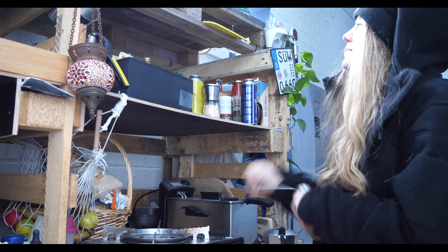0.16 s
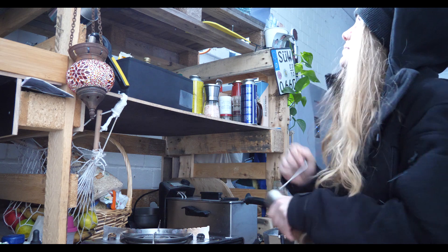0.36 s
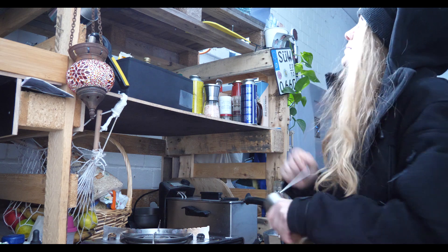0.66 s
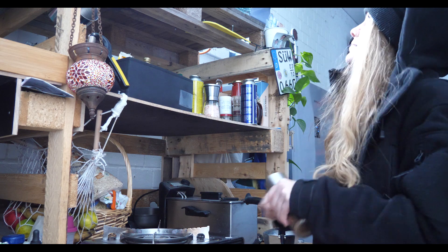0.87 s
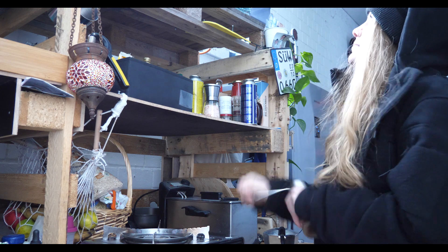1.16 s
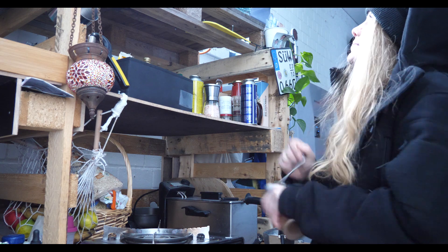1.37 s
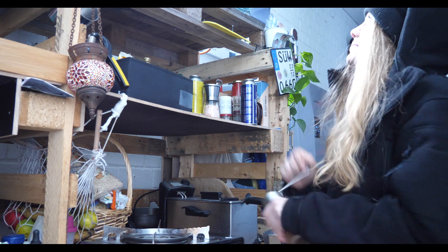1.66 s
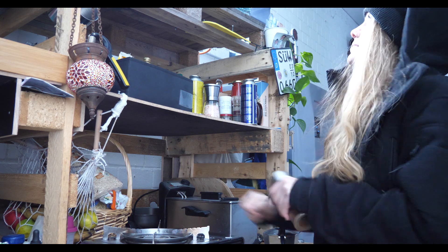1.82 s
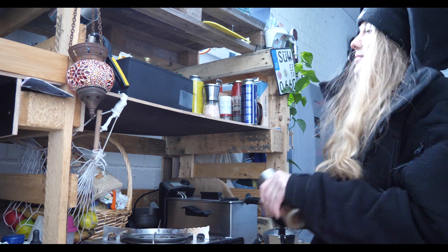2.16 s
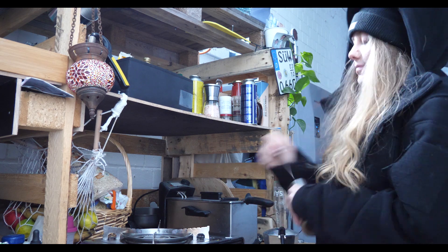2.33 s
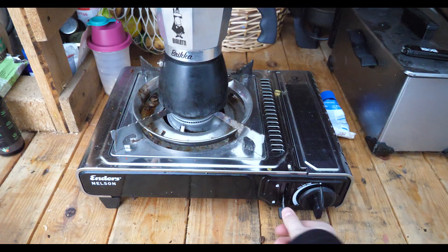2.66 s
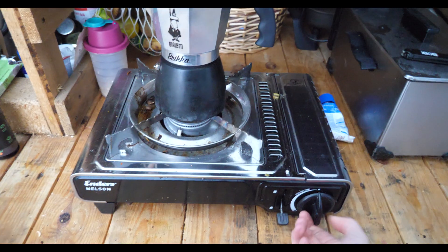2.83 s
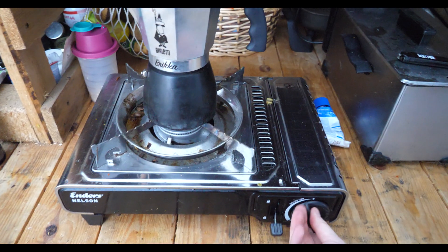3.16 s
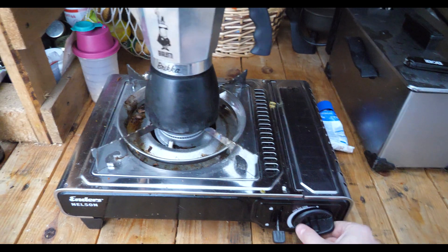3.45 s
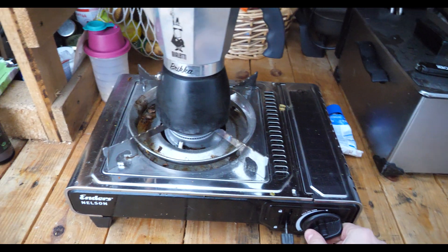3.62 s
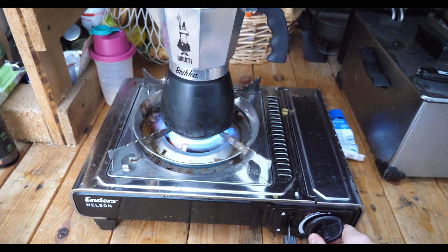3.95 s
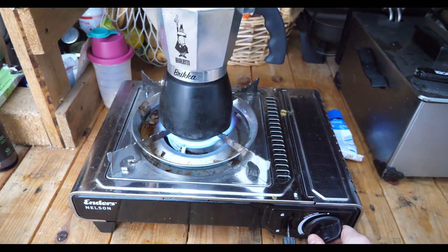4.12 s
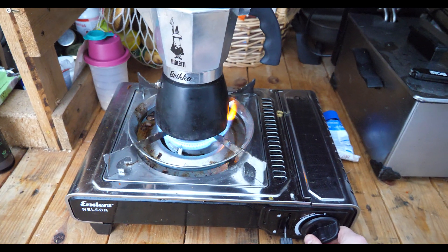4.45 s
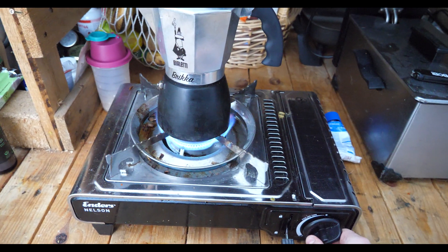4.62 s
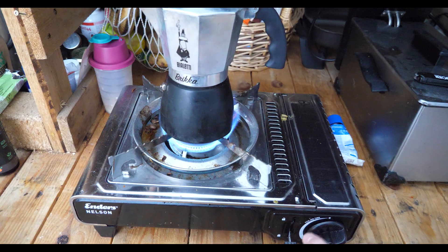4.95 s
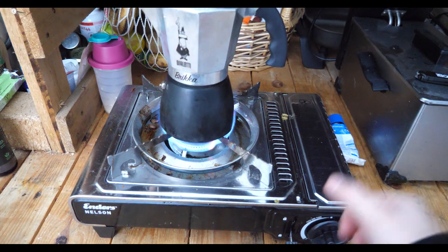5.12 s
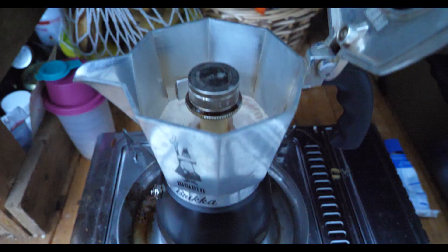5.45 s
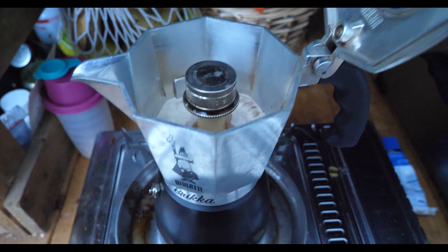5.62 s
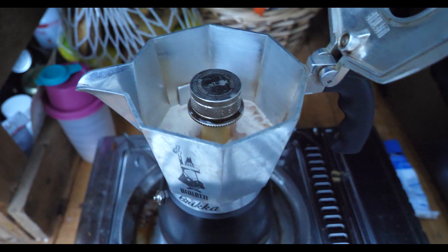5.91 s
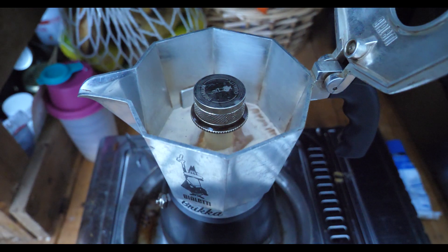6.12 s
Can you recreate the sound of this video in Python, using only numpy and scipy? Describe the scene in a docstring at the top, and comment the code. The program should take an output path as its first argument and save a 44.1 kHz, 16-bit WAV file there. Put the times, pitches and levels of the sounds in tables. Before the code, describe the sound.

Gritty hand grinding of coffee beans, hard metallic stove clicks, gas hiss and a soft ignition whoosh, then bubbling, fizzing coffee rising in a pot.

```python
"""A hand mill grinds coffee beans in a garage: random grains of noise ring its housing, and its shaft squeaks.
Then a camping stove's lever, knob and igniter clack as short noise bursts ringing at set pitches.
Its gas is steady noise coloured by a tube; the flame catches with a whoosh of noise, then flutters.
Last, an open moka pot gurgles and foams: grains and noise through resonances follow the coffee's flow.
Table levels are relative settings: the functions balance them further."""
import sys
import numpy as np
from scipy import signal
from scipy.fft import rfft, irfft, next_fast_len
from scipy.io import wavfile
from scipy.ndimage import map_coordinates

SR = 44100
rng = np.random.default_rng(int(sys.argv[2]) if len(sys.argv) > 2 else 0)


def to_wav(s):
    """Save 16-bit WAV."""
    ch = np.atleast_2d(s).T  # columns
    pcm = np.round(np.clip(ch, -1, 1) * 32767)  # PCM
    wavfile.write(sys.argv[1], SR, pcm.astype(np.int16))


N = 276948  # length in samples


def amp(db):
    """Turn decibels into gain."""
    return 10 ** (np.asarray(db) / 20)


def unit(x):
    """Scale x to an rms of 1."""
    return x / np.sqrt(np.mean(x ** 2) + 1e-20)


def along(points, hz):
    """Read values between (f/Hz, value) points on a log frequency axis."""
    f, v = np.transpose(points)
    return np.interp(np.log(hz + 1), np.log(f + 1), v)


def track(rows):
    """Draw straight lines between (t/s, value) rows, giving one value per sample."""
    return np.interp(np.arange(N) / SR, *np.transpose(rows))


def wobble(rate):
    """Draw a smooth random curve with rate knots a second."""
    knots = rng.standard_normal(N // 50)
    return map_coordinates(knots, [np.arange(N) * rate / SR], mode="wrap")


def swells(rows, attack_s, release_s):
    """Gain of (start t/s, length/s, level/dB) events: each rises to its start, holds and dies away."""
    t = np.arange(N) / SR
    power = 0
    for s, length, db in rows:
        rise = np.minimum(t - s, 0) / attack_s
        fall = np.maximum(t - s - length, 0) / release_s
        power = power + (amp(db) * np.exp(rise - fall)) ** 2
    return np.sqrt(power)


def during(start, end):
    """1 from 5 ms before start to 5 ms after end, with 5 ms fades beyond."""
    t = np.arange(N) / SR
    return np.clip(np.minimum(t - start, end - t) / 0.005 + 2, 0, 1)


def filtered(x, response):
    """Multiply the spectrum of x by a response that depends on frequency."""
    m = next_fast_len(x.shape[-1] + SR // 2)
    return irfft(rfft(x, m) * response(np.fft.rfftfreq(m, 1 / SR)), m)[..., :x.shape[-1]]


def colour(x, spectrum):
    """Shape x by a (f/Hz, level/dB) curve."""
    return filtered(x, lambda hz: amp(along(spectrum, hz)))


def resonate(x, modes):
    """Let x ring through (f/Hz, width/Hz, level/dB) resonances, with alternating signs."""
    def response(f):
        total = 0
        for k, (centre, width, db) in enumerate(modes):
            peak = 1j * f * width / (centre * centre - f * f + 1j * f * width)
            total = total + (-1) ** k * amp(db) * peak
        return total
    return filtered(x, response)


def ring(x, hz, width_hz):
    """Pass x through one resonance, which may move in pitch."""
    turn = np.exp(2j * np.pi * np.cumsum(hz * np.ones(x.shape[-1])) / SR)
    keep = np.exp(-np.pi * width_hz / SR)
    # turn the pitch down to zero, smooth, then turn it back up
    smooth = signal.lfilter([np.sqrt(2 * (1 - keep ** 2))], [1, -keep], x / turn)
    return (smooth * turn).real


def band(x, lo_hz, hi_hz):
    """Cut a steep band out of x; white noise keeps its rms."""
    hi_hz = min(hi_hz, SR * 0.45)
    sos = signal.butter(3, [lo_hz, hi_hz], "band", fs=SR, output="sos")
    return signal.sosfilt(sos, x) * np.sqrt(SR / 2 / (hi_hz - lo_hz))


def noise():
    """White noise for the middle and the side of the stereo field."""
    return rng.standard_normal((2, N))


def grains(rate, spread_db, life):
    """Tiny noise bursts at random times, rate a second; spread_db makes a few much larger than the rest."""
    sizes = (rng.random(N) < rate / SR) * amp(spread_db * np.minimum(rng.exponential(size=N), 4))
    power = signal.lfilter([1], [1, -np.exp(-2 / (life * SR))], sizes ** 2)
    return unit(np.sqrt(power) * noise())


def burst(t60, attack):
    """A puff of noise that starts sharply and dies away."""
    t = np.arange(SR // 2) / SR
    return rng.standard_normal((2, len(t))) * amp(-60 * t / t60) * (1 - np.exp(-t / attack))


def add(mix, s, sound):
    """Mix a sound in at s seconds."""
    part = mix[:, max(round(s * SR), 0):][:, :sound.shape[-1]]
    part += sound[..., :part.shape[-1]]


# how hard the burrs work; the crank nearly stalls once: t/s, level/dB
MILL_LOAD = [(0.0, -31), (0.17, -32), (0.32, -30), (0.57, -30.5), (0.67, -30), (0.76, -30.5), (0.91, -28),
             (1.07, -32), (1.17, -29), (1.245, -38), (1.43, -27.5), (1.52, -31), (1.71, -28), (1.9, -29),
             (2.08, -31), (2.33, -31), (2.41, -32), (2.54, -30)]
# the burrs bite into a batch of beans: start t/s, length/s, level/dB, fragment pitch f/Hz
CRUNCHES = [(0.005, 0.1, -24, 1660), (0.286, 0.06, -24, 1530), (0.491, 0.031, -26, 2100),
            (0.672, 0.035, -27, 1560), (0.781, 0.059, -26, 2030), (0.914, 0.015, -23.5, 1660),
            (0.976, 0.024, -26, 1640), (1.281, 0.11, -29.5, 1900), (1.424, 0.03, -21.5, 1620),
            (1.534, 0.02, -24, 1870), (1.653, 0.06, -24, 1640), (1.924, 0.083, -25, 1660),
            (2.189, 0.014, -23.5, 1650), (2.25, 0.085, -29.5, 1590), (2.466, 0.081, -23.5, 1770)]
# whole beans breaking: t/s, level/dB, f/Hz
BEAN_CRACKS = [(0.0034, -9, 1780), (0.2797, -13, 1620), (0.3221, -14, 1600), (0.5042, -8, 2170),
               (0.6538, -5, 1600), (0.823, -10, 2120), (0.9047, -3, 1640), (0.9114, -9, 1580),
               (0.9741, -10, 1640), (0.9804, -9, 1590), (1.0325, -9, 1630), (1.4214, -11, 1620),
               (1.4266, -6, 1640), (1.4424, -9, 1610), (1.5433, -12, 1910), (1.6381, -10, 1540),
               (1.69, -9, 1590), (1.8047, -13, 1550), (2.1569, -13, 1640), (2.1903, -11, 1620),
               (2.324, -9, 1450)]
# colour of the crushing: f/Hz, level/dB
GRIT_COLOUR = [(40, -77), (80, -26), (180, -24.5), (350, -6.5), (440, -10.5), (570, -4.5), (1000, -6),
               (2300, -4), (3000, -8.5), (4300, -5), (5800, -14), (9500, -14), (13000, -43), (15500, -35)]
# resonances of the mill's housing: f/Hz, width/Hz, level/dB
HOUSING_MODES = [(814.5, 20, -7.5), (860, 45, -10.5), (1334, 33, -6.5), (1445, 32, -5.5), (1619, 43, 0),
                 (1825, 34, -5.5), (2070, 190, -10), (3615, 67, -13), (4340, 77, -14.5), (4690, 39, -12.5)]
# the crank rocks the cup, which knocks against the mill: t/s, level/dB
CUP_KNOCKS = [(0.0, -31), (0.085, -31), (0.115, -31), (0.205, -25), (0.27, -32.5), (0.405, -27),
              (0.465, -37), (0.57, -27), (0.81, -25), (0.885, -30), (0.97, -31), (1.125, -30), (1.375, -25),
              (1.42, -27.5), (1.465, -33), (1.55, -33), (1.625, -35), (1.68, -33), (1.805, -28.5),
              (1.86, -30), (2.005, -33), (2.18, -28), (2.28, -31), (2.415, -37), (2.48, -34.5)]
# resonances of the cup: f/Hz, width/Hz, level/dB
CUP_MODES = [(258.5, 27.6, -2), (314.2, 19, 3), (403, 11, -15)]
# beans slide down the steel hopper: start t/s, length/s, level/dB
BEAN_SLIPS = [(0.01, 0.0069, -33), (0.08, 0.044, -33), (0.36, 0.073, -41), (0.58, 0.03, -39.5),
              (0.7, 0.037, -33), (0.85, 0.082, -38.5), (1.0, 0.039, -34.5), (1.15, 0.025, -32.5),
              (1.41, 0.059, -37.5), (1.7, 0.049, -31), (1.97, 0.07, -37), (2.13, 0.025, -34.5),
              (2.31, 0.024, -31)]
# colour of beans on steel: f/Hz, level/dB
SLIDE_COLOUR = [(500, -47.5), (4000, -0.5), (6500, -5.5), (8000, 0.5), (9000, -3.5), (11200, -1),
                (13000, -5.5), (15500, -17.5)]
# the shaft rubs in its bearing nearly four times a second: start t/s, length/s, level/dB
SHAFT_RUBS = [(0.06, 0.062, -32), (0.29, 0.12, -40.5), (0.595, 0.19, -39), (0.9, 0.13, -41.5),
              (1.155, 0.017, -29.5), (1.4, 0.1, -43), (1.6, 0.15, -40.5), (1.89, 0.13, -36.5),
              (2.13, 0.18, -38.5), (2.43, 0.03, -37)]
# resonances of the steel shaft: f/Hz, width/Hz, level/dB
SHAFT_MODES = [(8075, 60, -7), (9503, 38, 0), (13212, 28, -6)]
MILL_STOP_S, CHIRP_WIDTH_HZ = 2.551, 150
CRUNCH_DB, CRUNCH_GROWS = -1.5, 1.4  # steady crunch relative to the average load; its dB per dB of load
TRICKLE_DB = -10  # beans shifting between slips, relative to the load
CUP_TREMOR_DB = -44  # the cup trembles between knocks


def mill():
    """Burrs crush fragments and whole beans; the housing rings, the cup knocks and the rubbing shaft squeaks."""
    t = np.arange(N) / SR
    load_db = track(MILL_LOAD)
    usual_db = load_db.mean()
    extra_db = load_db - usual_db

    steady = amp(usual_db + CRUNCH_DB + CRUNCH_GROWS * extra_db + 0.5 * wobble(35.2))
    bites = swells([row[:3] for row in CRUNCHES], attack_s=0.0072, release_s=0.023)
    crunch = np.hypot(steady, bites)
    crunch_hz = track([(s + length / 2, hz) for s, length, _, hz in CRUNCHES])
    grit = amp(load_db + 2.1) * unit(colour(grains(rate=1100, spread_db=1.5, life=0.0082), GRIT_COLOUR))
    shaking = grains(rate=440, spread_db=2.5, life=0.00063)
    housing = amp(-0.5) * crunch * unit(resonate(shaking, HOUSING_MODES))
    # the fragments chirp together at one wandering pitch
    chirp_hz = crunch_hz * 2 ** (0.17 * wobble(30))
    chips = grains(rate=290, spread_db=0.0, life=0.003)
    fragments = amp(-4.5) * crunch * unit(ring(chips, chirp_hz, CHIRP_WIDTH_HZ))

    cracks = np.zeros((2, N))
    for s, db, hz in BEAN_CRACKS:
        snap = burst(t60=0.031, attack=0.0001)
        crack = ring(snap, hz, width_hz=100) + amp(10) * colour(snap, GRIT_COLOUR)
        add(cracks, s, amp(db - 9.5) * crack)

    blows = np.zeros((2, N))
    for s, db in CUP_KNOCKS:
        add(blows, s, amp(db + 29.5) * burst(t60=0.036, attack=0.00039))
    tremor = unit(resonate(grains(rate=260, spread_db=0.8, life=0.0015), CUP_MODES))
    cup = resonate(blows, CUP_MODES) + amp(CUP_TREMOR_DB + extra_db) * tremor
    body_colour = [(40, -39.0), (170, -1), (240, 1), (5000, -1.5), (12000, -6.5)]
    body = colour(cup + housing + fragments + cracks, body_colour)

    slide = np.hypot(amp(load_db + TRICKLE_DB), swells(BEAN_SLIPS, attack_s=0.0059, release_s=0.017))
    beans = amp(4.5) * slide * unit(colour(grains(rate=6700, spread_db=5.0, life=0.00091), SLIDE_COLOUR))

    # friction keeps the shaft's notes singing, each wandering around its pitch
    singing = np.zeros(N)
    for hz, width, db in SHAFT_MODES:
        note_hz = hz + 1.4 * width * wobble(250)
        singing += amp(db) * np.sin(2 * np.pi * np.cumsum(note_hz) / SR)
    rubbing = amp(0.5 + 2.85 * wobble(40.56)) * swells(SHAFT_RUBS, attack_s=0.017, release_s=0.047)
    middle_only = [[1], [0]]
    squeak = rubbing * (unit(singing) * middle_only + unit(resonate(noise(), SHAFT_MODES)))
    return (grit + body + beans + squeak) * (t < MILL_STOP_S)


# colour of the quiet garage: f/Hz, level/dB
AIR_COLOUR = [(18, -96), (30, -59.5), (69, -9), (130, -2), (591, -10), (830, -8.5), (921, -13), (996, -4),
              (1140, -22), (1640, -8), (2020, -18), (2240, -13.5), (15500, -22)]


def quiet_air():
    """The garage's faint background is coloured noise that drifts in level."""
    return amp(-61.0 + 0.43 * wobble(4.09)) * unit(colour(noise(), AIR_COLOUR))


# lever, knob and igniter; thud, snap and ring are relative to the clack;
# decay sets the t60 of clack, ring, snap and thud; boom and case blow have fixed ones:
# t/s, level/dB, thud level/dB, snap level/dB, ring level/dB, clack f/Hz, decay/s
STOVE_CLICKS = [(2.551, -22, 3.5, 2, -3.5, 2880, 0.25), (2.577, -2.5, -14.5, -4.5, -15, 2450, 0.043),
                (2.767, -22.5, -6, -22, -12, 2560, 0.08), (2.839, -26.5, 0.5, -7, -9, 2640, 0.04),
                (2.864, -30.5, -7.5, -12, -3, 744, 0.049), (2.866, -42, -7, -12, 5.5, 2590, 0.027),
                (2.995, -49, -14, -6, -12, 1486, 0.17), (3.064, -57, 21.5, 5, -24, 1970, 0.17),
                (3.084, -19.5, -5.5, -5, -17.5, 2140, 0.033), (3.089, -3, -10.5, -21, -22, 2060, 0.012),
                (3.0888, -16, -29, -25, 0.5, 8550, 0.024), (3.546, -28, 1, -8, -24, 2320, 0.055),
                (3.553, -25, -3.5, 0.5, -8.5, 1450, 0.051), (3.943, -3, -21, 4.5, -11, 1950, 0.025),
                (4.103, -22, -4.5, 4, -17.5, 2440, 0.03), (4.534, -53, -15, -20, -2, 2350, 0.14),
                (4.7148, -41.5, 0.5, -2, -3, 797, 0.092), (4.835, -22, -5.5, -34, -3.5, 1235, 0.078),
                (4.917, -47.5, 11, -18, -13, 1390, 0.048)]
# resonances of the sheet steel case: f/Hz, width/Hz, level/dB
CASE_MODES = [(339, 55, -10), (404, 60, -11), (769, 12, -3.5), (1345, 60, -7), (1850, 300, -20.5),
              (2440, 90, -17.5), (2660, 60, -35), (3970, 99, -18.5)]
CLACK_Q = 23  # sharpness of each contact's ring: its pitch over its width


def clicks():
    """Each contact is a ringing clack, a thud and a shorter snap; it also shakes the steel case and the table."""
    out, blows = np.zeros((2, N)), np.zeros((2, N))
    for s, db, thud_db, snap_db, ring_db, hz, decay in STOVE_CLICKS:
        clack = band(burst(t60=1.34 * decay, attack=0.00095), hz / 2.34, hz * 1.625)
        note = amp(ring_db + 7.0) * ring(burst(t60=decay, attack=0.00084), hz, hz / CLACK_Q)
        snap = amp(snap_db + 1.5) * band(burst(t60=0.79 * decay, attack=0.0007), lo_hz=5550, hi_hz=12400)
        thud = band(burst(t60=2.35 * decay, attack=0.0077), lo_hz=282, hi_hz=940)
        boom = amp(-17.5) * band(burst(t60=0.38, attack=0.0049), lo_hz=88, hi_hz=165)
        low = amp(thud_db - 5.5) * (thud + boom)
        add(out, s, amp(db - 6) * (clack + note + snap + low))
        add(blows, s, amp(db + thud_db) * burst(t60=0.041, attack=0.0008))
    return out + amp(23) * resonate(blows, CASE_MODES)


# how fast echoes die in the garage: f/Hz, t60/s
ROOM_DECAY = [(120, 0.44), (400, 0.4), (1500, 0.44), (4000, 0.42), (8000, 0.41), (14000, 0.12)]


def garage(x):
    """The room answers the middle signal 5 ms later with a noise tail; each frequency dies at its own speed."""
    hz, t, z = signal.stft(rng.standard_normal((2, SR)), SR, nperseg=256)
    fade = amp(-60 * t / along(ROOM_DECAY, hz)[:, None])
    tail = signal.istft(z * fade, SR, nperseg=256)[1]
    late = np.pad(x[0], (SR // 200, 0))[None]
    return signal.fftconvolve(late, tail / np.linalg.norm(tail[0]), axes=1)[:, :N]


# the gas jet after the valve is opened: t/s, level/dB
GAS_JET = [(3.3, -72), (3.47, -62.5), (3.75, -59.5), (4.1, -58.5), (4.39, -60), (5.51, -58.5)]
# colour of the jet's hiss: f/Hz, level/dB
JET_COLOUR = [(400, -38), (700, -13), (900, -40), (1150, -0.5), (1700, -26), (2300, -15), (3000, -33),
              (7000, -41), (8200, -5.5), (9500, -7.5), (11500, -15), (14500, -15.5), (15500, -18.5)]
# resonances of the mixing tube: f/Hz, width/Hz, level/dB
TUBE_MODES = [(1117, 38, 2), (1217, 71, -2.5), (1377, 47, -2.5), (2010, 96, -7), (2632, 24, -6),
              (3520, 54, -12.5), (4025, 30, -9), (5000, 90, -15.5), (5850, 49, -14.5), (6760, 40, -15),
              (8640, 85, -3), (8600, 130, -14.5), (10000, 29, -9.5)]
# colour of the flare's whoosh: f/Hz, level/dB
WHOOSH_COLOUR = [(180, -38), (300, -46), (431, -15.5), (720, -9.5), (821, -16), (1160, 4), (1300, -8),
                 (2140, -4.5), (2320, -7), (4720, -13.5), (8990, -12), (15500, -31)]
# the ring of flame catches in puffs: start t/s, length/s, level/dB
FLAME_PUFFS = [(4.06, 0.076, -41), (4.172, 0.018, -37)]
# colour of the flame: f/Hz, level/dB
FLAME_COLOUR = [(29, -68), (50, -45), (71, -25.5), (134, 3), (231, -2), (332, 2.5), (430, -12), (513, -19),
                (600, -46), (780, -51), (1320, -120)]
# pooled gas burning off: its peak, build-up and decay
FLARE_S, FLARE_DB, FLARE_RISE_S, FLARE_T60_S = 4.02, -23, 0.066, 0.5
FLAME_ON_S, FLAME_DB, FLAME_SINKS_DB_PER_S = 4.0, -50.5, 1.5  # the settled flame
BURNER_OFF_S = 5.5  # jet and settled flame end


def burner():
    """Gas hisses through the mixing tube; the pooled gas flares and leaves a fluttering flame."""
    t = np.arange(N) / SR
    hiss = amp(-0.5) * unit(colour(noise(), JET_COLOUR)) + amp(3.0) * unit(resonate(noise(), TUBE_MODES))
    jet = during(GAS_JET[0][0], BURNER_OFF_S) * amp(track(GAS_JET)) * hiss

    build_up = np.clip(1 + (t - FLARE_S) / FLARE_RISE_S, 0, 1)
    burn_off = amp(FLARE_DB - 60 * np.maximum(t - FLARE_S, 0) / FLARE_T60_S)
    flare = build_up * burn_off * unit(colour(noise(), WHOOSH_COLOUR))

    sinking = amp(FLAME_DB - FLAME_SINKS_DB_PER_S * (t - FLAME_ON_S))
    settled = during(FLAME_ON_S, BURNER_OFF_S) * sinking
    burning = np.hypot(settled, swells(FLAME_PUFFS, attack_s=0.048, release_s=0.01))
    flutter = amp(1.6 * wobble(36))
    flame = burning * flutter * unit(colour(noise(), FLAME_COLOUR))
    return jet + flare + flame


# coffee rising up the spout: t/s, flow level/dB
COFFEE_FLOW = [(5.513, -46), (5.56, -40.5), (5.68, -45.5), (5.86, -43), (5.93, -29), (6.05, -29),
               (6.2, -29.5), (6.28, -27)]
# steam escapes ahead of the coffee: start t/s, length/s, level/dB
EARLY_STEAM = [(5.52, 0.11, -43.5)]
# colour of the hollow top chamber: f/Hz, level/dB
CHAMBER_COLOUR = [(40, -74), (120, -6.5), (190, -12), (310, -12), (380, -14), (460, -8), (550, -29),
                  (650, 3), (750, -16), (890, 5.5), (1090, 8.5), (1450, 4), (1750, -5), (2600, -16),
                  (3500, -30.5)]
# resonances of the spout: f/Hz, width/Hz, level/dB
SPOUT_MODES = [(2490, 370, -10), (3790, 150, -5), (5700, 400, -7.5), (6190, 60, 2), (6800, 114, -1)]
# the spout's narrow notes: f/Hz, width/Hz, level/dB at full flow, growth in dB per dB of flow
SPOUT_NOTES = [(4340, 35, -39.5, 0.7), (3350, 45, -44, 0.3)]
# the upper note sings out as the coffee breaks through: start t/s, length/s, level/dB
NOTE_FLARES = [(5.93, 0.05, -32)]
# colour of the foam: f/Hz, level/dB
FOAM_COLOUR = [(200, -39), (2000, -19.5), (4000, -11), (7000, -11.5), (8000, -14.5), (9000, -3.5),
               (9800, 3), (10400, -5.5), (11000, 2), (11800, -11), (13300, -5), (14000, -21.5),
               (15500, -25)]
# bubbles bursting: t/s, level/dB, f/Hz
BUBBLE_SPITS = [(5.624, -25, 2500), (5.629, -17, 3940), (5.735, -32.5, 2600), (5.872, -26, 5550),
                (5.926, -29, 11600), (5.969, -39, 11000), (5.980, -41, 9750)]
FULL_FLOW_DB = -28.5  # the flow called full
# levels at full flow, and their dB per dB of flow
STEAM_DB, STEAM_GROWS = -30, 1.44
FOAM_DB, FOAM_GROWS = -25.5, 1.27
GLUG_DB, GLUG_GROWS = -38, 2.6  # low bubbling
GURGLE_HZ, GURGLE_SAG_HZ_PER_S = 1190, 460  # the bubbling starts high and sinks as the chamber fills
DIP_S, DIP_LENGTH_S, DIP_DB = 5.639, 0.013, -35  # the pot's sound dips briefly


def pot():
    """Steam and coffee gurgle up the spout into the hollow top chamber, where foam fizzes and spits."""
    t, start = np.arange(N) / SR, COFFEE_FLOW[0][0]
    flow_db = track(COFFEE_FLOW)
    rush, surge_db = amp(flow_db), flow_db - FULL_FLOW_DB

    chamber_grains = grains(rate=3000, spread_db=3, life=0.0049)
    chamber = amp(2) * rush * unit(colour(chamber_grains, CHAMBER_COLOUR))
    sagging_hz = GURGLE_HZ - GURGLE_SAG_HZ_PER_S * np.maximum(t - start, 0)
    bubbling_hz = sagging_hz * 2 ** (0.09 * wobble(40))
    bubbles = grains(rate=1500, spread_db=0.5, life=0.0055)
    gurgle = amp(-3.0) * rush * unit(ring(bubbles, bubbling_hz, width_hz=140))
    low_bubbles = band(grains(rate=260, spread_db=3.0, life=0.0072), lo_hz=405, hi_hz=666)
    glug = amp(GLUG_DB + GLUG_GROWS * surge_db) * unit(low_bubbles)

    early = swells(EARLY_STEAM, attack_s=0.01, release_s=0.034)
    steam = np.hypot(amp(STEAM_DB + STEAM_GROWS * surge_db), early)
    spout = amp(1.5 * wobble(60)) * steam * unit(resonate(noise(), SPOUT_MODES))
    whistle = np.zeros((2, N))
    for hz, width, db, grows in SPOUT_NOTES:
        whistle += amp(db + grows * surge_db) * ring(noise(), hz, width)
    upper_hz, upper_width = SPOUT_NOTES[0][:2]
    sing_out = swells(NOTE_FLARES, attack_s=0.031, release_s=0.022)
    whistle += sing_out * ring(noise(), upper_hz, upper_width)

    foam = colour(grains(rate=1300, spread_db=1.0, life=0.003), FOAM_COLOUR)
    fizz = amp(FOAM_DB + FOAM_GROWS * surge_db) * unit(foam)
    spits = np.zeros((2, N))
    for s, db, hz in BUBBLE_SPITS:
        pop = band(burst(t60=0.047, attack=0.00045), hz / 3.4, hz * 1.38)
        add(spits, s, amp(db) * pop / np.abs(pop).max())

    flowing = (chamber + gurgle + glug + spout + whistle + fizz) * during(start, N / SR) * amp(-5)
    dip_db = DIP_DB * swells([(DIP_S, DIP_LENGTH_S, 0)], attack_s=0.0066, release_s=0.014)
    return (flowing + spits) * amp(dip_db)


# how alike left and right are: f/Hz, likeness (1 = identical)
LEFT_RIGHT_LIKENESS = [(100, 1), (300, 0.99), (1000, .92), (2500, 0.79), (8000, 0.98), (13000, 0.8)]


def stereo(pair):
    """Turn middle and side into left and right, as alike as the two microphones hear them."""
    def shares(hz):
        turn = np.arccos(np.clip(along(LEFT_RIGHT_LIKENESS, hz), 0, 1)) / 2
        return np.array([np.cos(turn), np.sin(turn)])
    mid, side = filtered(pair, shares)
    return np.array([mid + side, mid - side])


def scene():
    """Mill, stove and pot, close to the microphones in the quiet garage."""
    stove = clicks()
    echo = amp(-9.5) * garage(stove)
    return stereo(mill() + quiet_air() + stove + echo + burner() + pot())


TOP_HZ = 15900  # band limit


def record(dry):
    """The camera cuts the deepest bass, clips at full scale and keeps nothing above its band limit."""
    thin = colour(dry, [(25, -12.0), (55, -12.5), (85, -0.5)])
    return filtered(np.clip(thin, -1, 1), lambda hz: hz < TOP_HZ)


dry = scene()
out = record(dry)
to_wav(out)
```